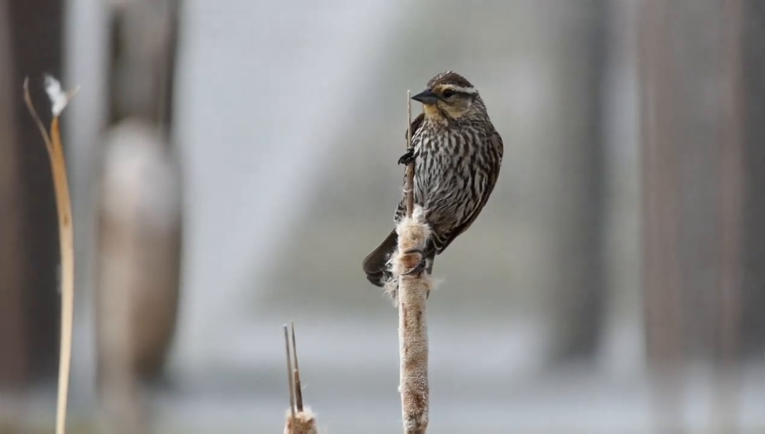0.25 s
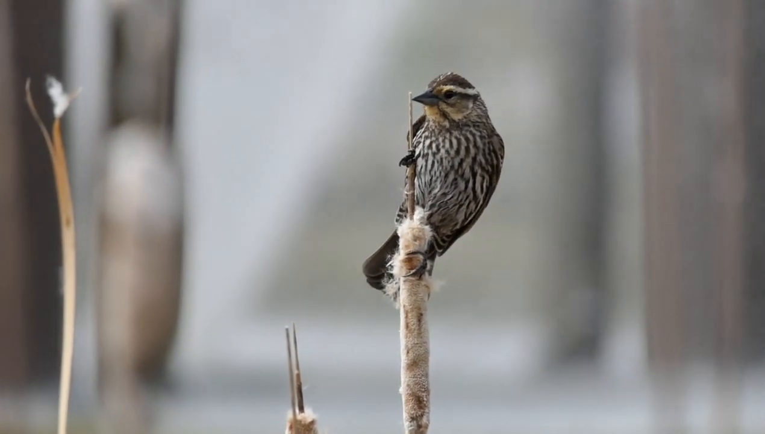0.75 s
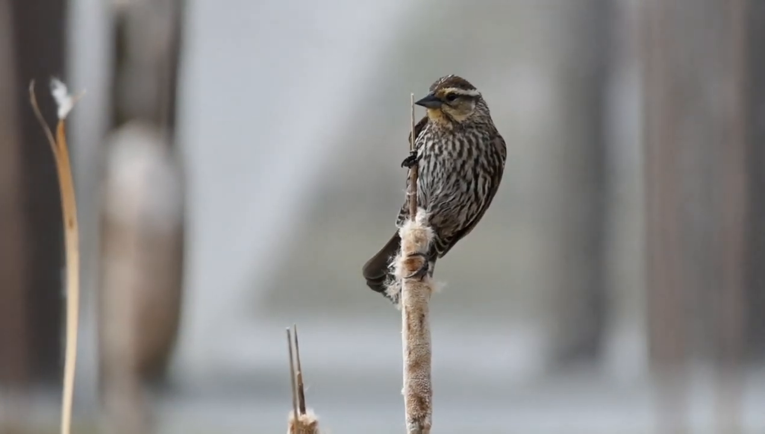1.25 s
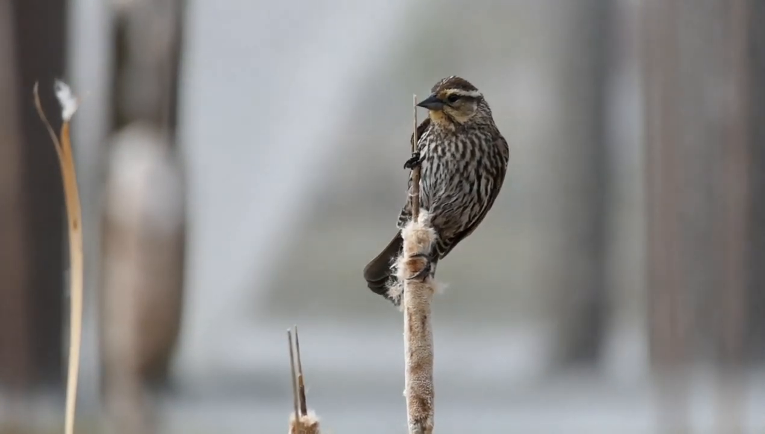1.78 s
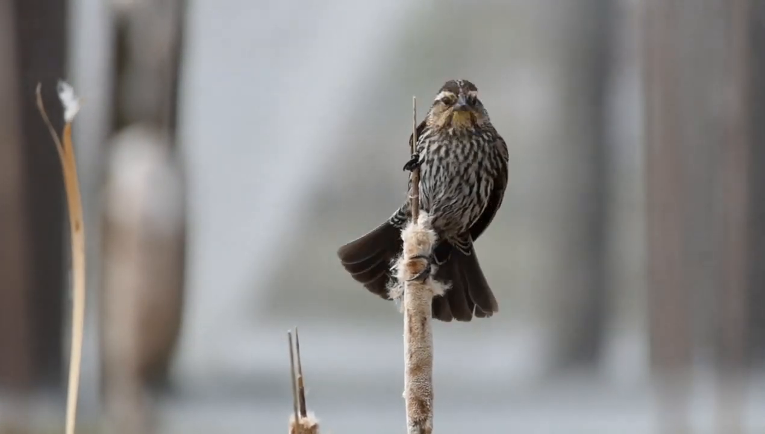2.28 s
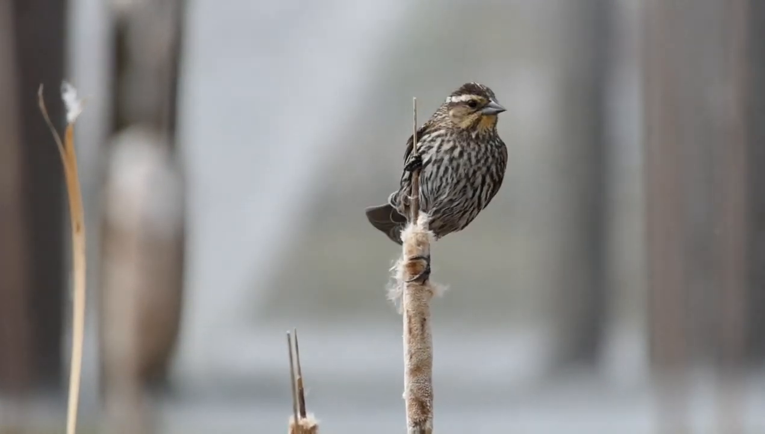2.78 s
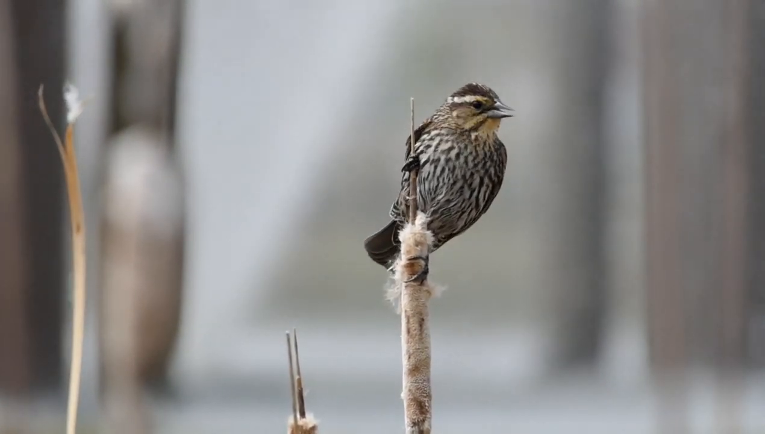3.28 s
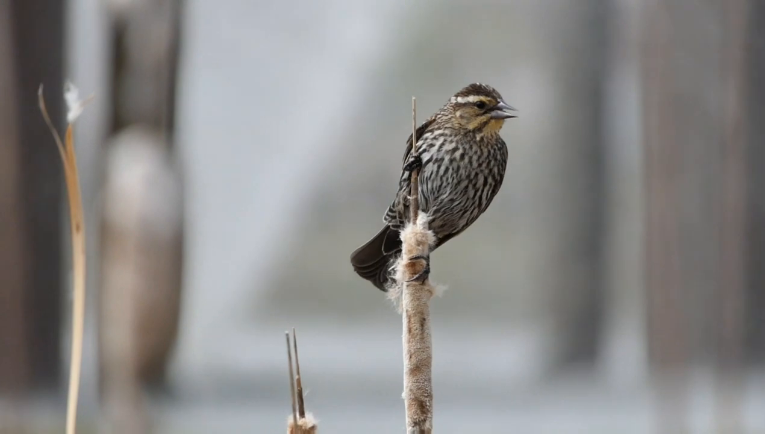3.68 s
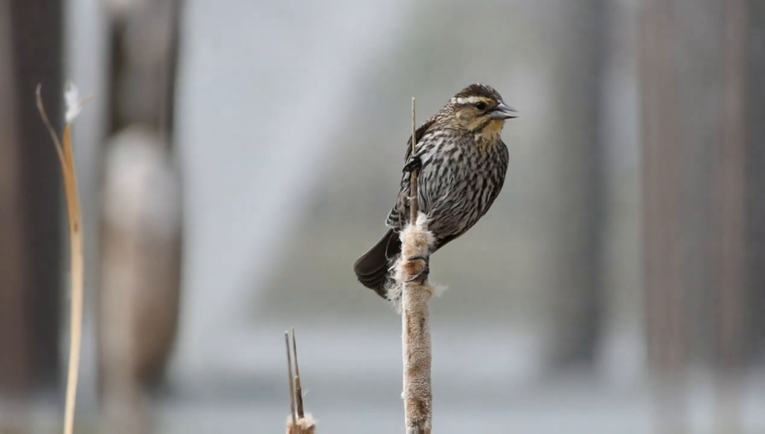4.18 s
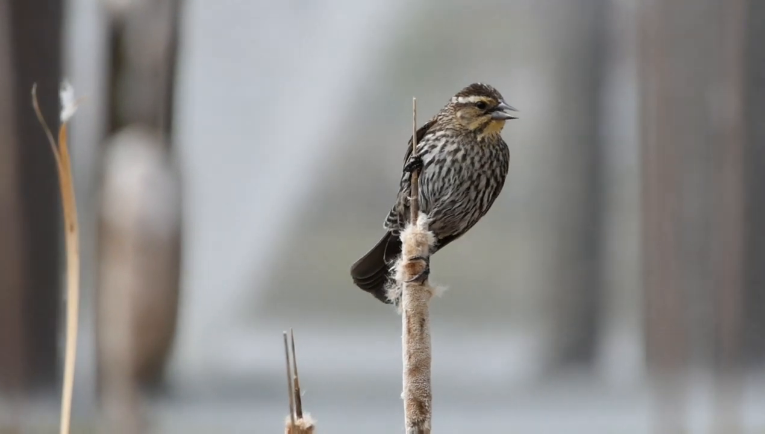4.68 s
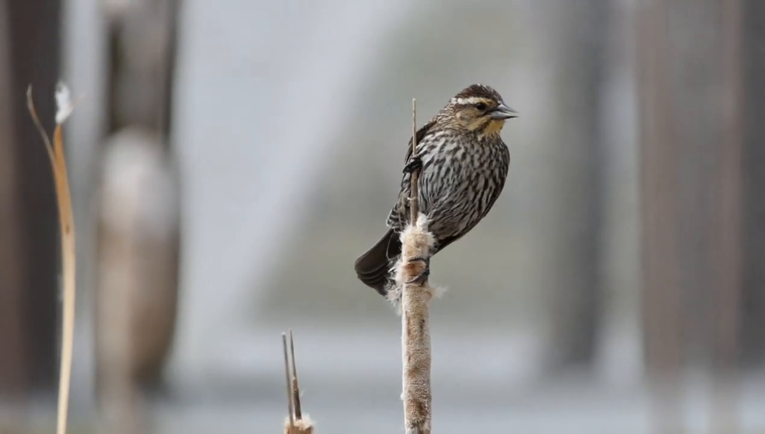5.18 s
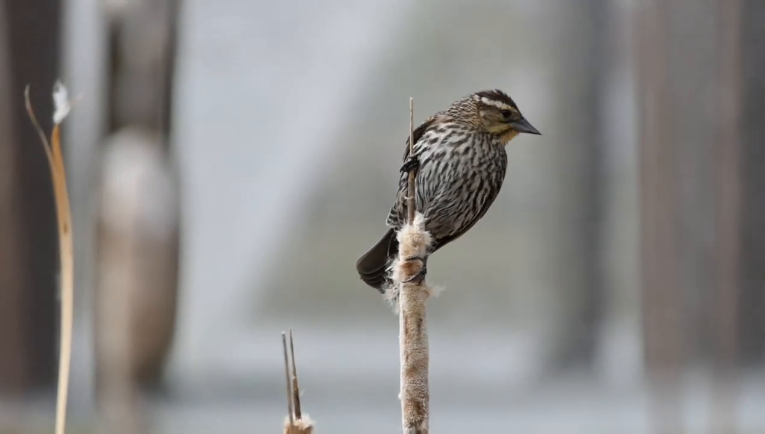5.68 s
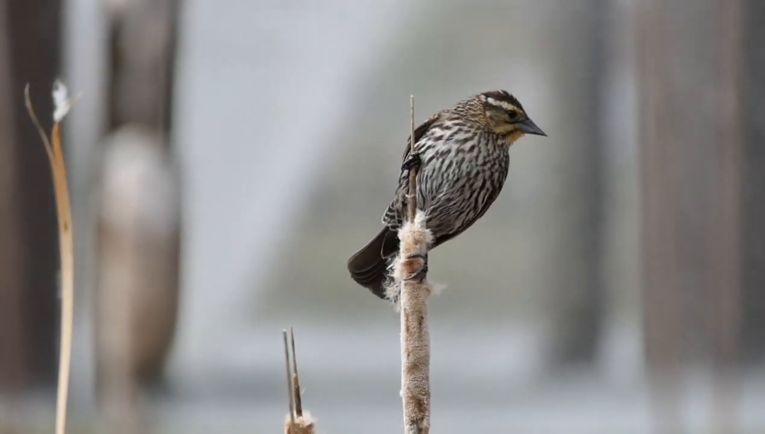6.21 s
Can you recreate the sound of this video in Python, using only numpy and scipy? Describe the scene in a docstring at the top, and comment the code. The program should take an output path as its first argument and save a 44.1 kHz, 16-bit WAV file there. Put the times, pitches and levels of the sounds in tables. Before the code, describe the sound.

In a marsh, a blackbird on the left gives three clear half-second whistles, each dropping sharply and then holding its pitch. Another near the middle makes short harsh chacks and, between the second and third whistles, a quick run of chattering notes. Dry reed stems tick now and then, and distant traffic hums and roars throughout. After the chatter, a sharp click comes as the whole sound dips, then creeps back.

```python
"""A reed bed, with traffic roaring and humming in the distance and dry stems ticking. To the left of the
microphone a blackbird gives three falling whistles, near-sine tones from its syrinx. Another, in the reeds near
the middle, chacks (rough pulses and breath through an open throat) and runs off a chatter. Whistles and chatter
echo off stems, water and a bank. The camera's gain control leans on the loud whistles. Separately, just after
the chatter, a sharp click sounds and the whole level drops at once, then creeps back."""
import sys
import numpy as np
from scipy import signal
from scipy.io import wavfile
from scipy.ndimage import uniform_filter1d

SR = 44100
rng = np.random.default_rng(int(sys.argv[2]) if len(sys.argv) > 2 else 0)


def wav_record(signal):
    """Record a signal, one row per channel, as 16-bit PCM in the file named by sys.argv[1]."""
    frames = np.transpose(np.atleast_2d(signal))
    bounded = np.clip(frames, -1, 1)
    # unit amplitude maps onto the largest positive 16-bit level
    quanta = np.round(bounded * 32767).astype(np.int16)
    wavfile.write(sys.argv[1], SR, quanta)


N = 284445

# Distant traffic, low and high parts of one spectrum: (frequency [Hz], relative density [dB])
RUMBLE_SPECTRUM = [(20, -39), (42, -38.5), (70, -18.5), (120, -12.5), (200, -6.5), (270, -10), (360, -27),
                   (450, -13.5)]
ROAR_SPECTRUM = [(660, -8.5), (900, -16.5), (1300, -11.5), (1700, -16), (2050, -20.5), (2700, -17),
                 (3500, -20.5), (4000, -27), (4600, -31.5), (5200, -30.5), (7500, -33.5), (9000, -40.5),
                 (11000, -50), (11900, -57), (15000, -102.5)]
# Its slow swell: (time [s], level [dB], tilt above 1500 Hz [dB/octave])
ROAR_SWELL = [(0, -21.5, 0.34), (1, -21.5, 0.77), (2, -21.5, 0.26), (3, -21, 0.97), (4, -20.5, 1.3),
              (4.899, -19.5, 1.5), (5.2, -20, 1), (6.45, -21.5, 0.4)]
# Traffic at the two sides of the microphone: (frequency [Hz], coherence [0-1])
ROAR_COHERENCE = [(60, 0.49), (140, 0.92), (350, 0.87), (1000, 0.94), (2000, 0.85), (3000, 0.96),
                  (4500, 0.807), (8000, 0.9), (11500, .7)]
# Its earlier arrival on the left: (frequency [Hz], phase lead [rad])
ROAR_LEFT_LEAD = [(0, 0.028), (1030, 0.36), (1460, -0.0), (1890, 0), (2840, 0.0), (4480, 0.052),
                  (11800, 0.05)]
# Its balance: (frequency [Hz], left minus right [dB])
ROAR_BALANCE = [(60, -0.5), (220, -3), (840, -1), (3120, 0), (11700, 0.0)]
# Faint traffic tones: (frequency [Hz], level [dB], drift width [Hz], steady to drifting part [ratio])
HUM_TONES = [(79.8, -61.5, 2, 1.5), (110.2, -50, 1.5, 2.3), (133, -41, 1.7, 1.9), (260, -45.5, 4.3, 0.29),
             (314.4, -41.5, 6.7, 0.63)]
# Three strong traffic tones: (frequency [Hz], drift width [Hz], steady to drifting part [ratio])
DRONE_TONES = [(54.3, 1., 8.7), (172.8, 27, 2.5), (240, 11, 2.5)]
# Their swelling: (time [s], first level [dB], second level [dB], third level [dB])
DRONE_SWELL = [(0.0, -41, -41, -34), (0.07, -39.5, -25.5, -29), (1.6, -42, -28.5, -23),
               (1.85, -43, -29.5, -36), (2.14, -40, -27, -23.5), (3.18, -43, -31.5, -34),
               (3.32, -40, -32, -23), (3.74, -41, -27.5, -28.5), (3.84, -45, -36, -42),
               (3.93, -35.5, -30, -18.5), (4.11, -42, -29.5, -34), (4.26, -36.5, -32.5, -24.5),
               (4.78, -34, -31.5, -35.5), (4.87, -45, -30, -21), (4.92, -45, -28.5, -31),
               (5.44, -37, -26, -26.5), (6.23, -40.5, -28, -37.5), (6.45, -44, -27, -26)]
# Harsh calls: (middle [s], level [dB], length [s], throat tuning [ratio], left minus right [dB])
CHACK_CALLS = [(0.014, -19.5, 0.032, 1.04, -4), (0.079, -12.5, 0.06, 0.98, -0.5),
               (3.253, -13.5, 0.053, 0.99, 1), (3.46, -10.5, 0.053, 1.01, 1),
               (3.684, -23.5, 0.074, 1.01, 1.5), (4.352, -23.5, 0.0376, 1.04, -5.5),
               (4.934, -14.5, 0.02, 1.07, -2)]
# Throat resonances: (frequency [Hz], width [Hz], relative level [dB])
THROAT_RESONANCES = [(2830, 490, 0), (3296, 420, -1.5), (7000, 1000, -20)]
# Snaps of dry stems, and in the last row a sharp click just as the whole level drops:
# (time [s], peak level [dB], frequency [Hz])
LOUD_TICKS = [(2.011, -16, 3200), (2.0725, -9, 2970), (2.0894, -12, 2570), (2.115, -5, 2730),
              (2.1809, -10.5, 2900), (3.3735, -13, 2510), (3.8751, -10, 2780), (4.9008, -14, 2800)]
# Whistles on the left: (pitch crest [s], release [s], effort [dB], closing fade [s], fade [dB],
# pitch shift in the fade [Hz], final flick [Hz], overtone boost [dB])
WHISTLE_NOTES = [(.778, 1.262, -3, 0.1, -5, -8.5, -89, -1), (2.8, 3.269, -4, .09, -4, 51, 100, 1.5),
                 (5.355, 5.841, -7, 0.061, -13.5, 33.5, 1, -9.5)]
# Brief dips in the whistle's loudness: (deepest point [s], depth [dB], way down [s], way back [s])
WHISTLE_DIPS = [(.92, -6.5, .08, 0.038), (1.0, -0.5, .05, 0.054), (1.15, -1.5, 0.033, .04),
                (2.932, -2, 0.017, 0.016), (2.975, -5.5, 0.066, 0.023), (3.02, -2, .06, 0.088),
                (3.2, -1, .02, .05), (5.455, -1.5, 0.065, .01), (5.471, -17, .012, 0.023),
                (5.56, -0.5, .04, .05), (5.625, -2.5, .03, 0.023), (5.7, -3, .03, .03),
                (5.745, -3.5, .03, 0.033), (5.825, -5, .03, 0.011)]
# Thin upward squeak just before a whistle: (time [s], length [s], from [Hz], to [Hz], effort [dB])
SQUEAK_NOTES = [(0.749, .012, 3400, 4630, -24.5)]
# Harmonics of each voice: (multiple, relative level [dB], extra change with loudness [dB/dB],
# left minus right [dB], left phase lead [rad])
WHISTLE_HARMONICS = [(1, -2.5, 0, 7.5, 0), (2, -32, 1.3, 1, 1.5), (3, -23.5, 0.4, 6.5, 4)]
CHATTER_HARMONICS = [(1, 0, 0.043, -1.3, 0.12), (2, -27.5, 0.24, -1, 0.09), (3, -25.5, 0.46, -.5, .1)]
# One firm echo off a bank, whistler's row then chatterer's: (delay [s], level [dB])
BANK_ECHOES = [(0.012, -20.5), (0.0129, -10.5)]
# Chatter in the reeds: (time [s], time to second crest [s], first crest [Hz], dip [Hz],
# second crest [Hz], effort [dB], swell up to the second crest [dB])
CHATTER_NOTES = [(3.803, .030, 3670, 3550, 3870, -17, -7), (3.909, 0.037, 3550, 2750, 3280, -15, -9),
                 (4.018, 0.033, 3516, 3320, 3635, -12.5, -0.5),
                 (4.133, 0.042, 3417, 3300, 3370, -13.5, 0.5), (4.249, 0.043, 3275, 3150, 3220, -12.5, 1.5),
                 (4.37, 0.038, 3246, 2990, 3170, -14.5, -7), (4.488, .044, 3455, 3010, 3470, -10.5, 2),
                 (4.616, 0.042, 3320, 3070, 3430, -10, 0.5), (4.752, .040, 3262, 3222, 3174, -10.5, 2)]
# The whole level falls at once and creeps back: (time [s], step [dB], recovery [dB/s])
LEVEL_DROP = (4.904, -7, 3.9)


def gain_of(db):
    """Decibels to gain."""
    return 10 ** (np.asarray(db) / 20)


def unit_rms(x):
    """Scales to rms 1."""
    return x / np.sqrt(np.mean(np.abs(x) ** 2) + 1e-20)


def curve_at(points, hz):
    """Interpolates a table on a log-frequency axis."""
    f, value = np.transpose(points)
    return np.interp(np.log(hz + 1), np.log(f + 1), value)


def add(mix, start_s, sound):
    """Mixes a sound in at its start time."""
    part = mix[..., max(round(start_s * SR), 0):][..., :sound.shape[-1]]
    part += sound[..., :part.shape[-1]]


def panned(x, lean_db):
    """Places a mono sound left (+) or right (-) of the microphone."""
    return x * gain_of(np.array([[.5], [-.5]]) * lean_db)


def smooth(x, span_s):
    """Rounds the corners of a control curve."""
    return uniform_filter1d(x, max(round(span_s * SR), 1), mode="nearest")


def traffic_roar(patchy_db=1.3):
    """Far tyres and engines all round the microphone: noise with drifting louder and softer patches."""
    frames, hz = N // 256 + 5, np.fft.rfftfreq(1024, 1 / SR)
    a, b, c, d, patches = rng.standard_normal((frames, 513, 5)).T
    left, independent = a + 1j * b, c + 1j * d
    patches = unit_rms(uniform_filter1d(uniform_filter1d(patches, 12, 0), 14, 1))
    coherence = np.clip(curve_at(ROAR_COHERENCE, hz), -1, 1)[:, None]
    spectra = np.array([left, coherence * left + np.sqrt(1 - coherence ** 2) * independent])
    spectra[0] *= np.exp(1j * curve_at(ROAR_LEFT_LEAD, hz))[:, None]
    lean_db = np.array([[.5], [-.5]]) * curve_at(ROAR_BALANCE, hz)
    shape_db = curve_at(RUMBLE_SPECTRUM + ROAR_SPECTRUM, hz) + lean_db
    spectra *= gain_of(shape_db[..., None] + patchy_db * patches)
    times, level_db, tilt_db = np.transpose(ROAR_SWELL)
    octaves = np.log2(np.maximum(hz / 1500, 1))[:, None]
    spectra *= gain_of(octaves * np.interp((np.arange(frames) - 2) * 256 / SR, times, tilt_db))
    noise = signal.istft(spectra, nperseg=1024, noverlap=768)[1][:, :N]
    return gain_of(np.interp(np.arange(N) / SR, times, level_db)) * unit_rms(noise)


def traffic_hum(lean_db=-2.0):
    """Low tones of the far traffic, a little to the right: each is part steady, part random drift."""
    t, out = np.arange(N) / SR, np.zeros(N)
    drift_t, drift_hz = np.arange(1024) * N / SR / 1024, np.fft.fftfreq(1024, N / SR / 1024)
    times, *levels = np.transpose(DRONE_SWELL)
    drones = [(hz, np.interp(t, times, db), width, steady)
              for (hz, width, steady), db in zip(DRONE_TONES, levels)]
    for hz, db, width, steady in HUM_TONES + drones:
        re, im = rng.standard_normal((2, 1024))
        drift = unit_rms(np.fft.ifft((re + 1j * im) * np.exp(-.5 * (2 * drift_hz / width) ** 2)))
        swing = np.interp(t, drift_t, (steady + drift) / np.hypot(steady, 1))
        out += np.sqrt(2) * gain_of(db) * (swing * np.exp(2j * np.pi * hz * t)).real
    return panned(out, lean_db)


def resonate(x, hz, width_hz):
    """A gliding resonance: shifts the curve hz down to zero, smooths twice and shifts back."""
    turn, pole = np.exp(2j * np.pi * np.cumsum(hz) / SR), np.exp(-np.pi * width_hz / SR)
    return 2 * (turn * signal.lfilter([(1 - pole) ** 2], [1, -2 * pole, pole * pole], x / turn)).real


def chacks(pulse_hz=380, jitter=.7, breath=1.7, opening=.088):
    """The bird in the reeds drives uneven pulses and breath noise through a wide-open throat."""
    out, t = np.zeros((2, N)), (np.arange(4096) - 2048) / SR
    for middle, db, length, tuning, lean_db in CHACK_CALLS:
        wobble, hiss = rng.standard_normal((2, len(t)))
        cycles = np.cumsum(pulse_hz * (1 + jitter * unit_rms(uniform_filter1d(wobble, 60)))) / SR
        drive = unit_rms(np.diff(np.floor(cycles), prepend=0)) + breath * hiss
        rise = tuning * (1 + opening * np.tanh(3 * t / length))  # resonances rise as the bill opens
        voice = sum(gain_of(peak_db) * unit_rms(resonate(drive, hz * rise, width))
                    for hz, width, peak_db in THROAT_RESONANCES)
        burst = gain_of(db) * unit_rms(voice) * np.exp(-.5 * (4 * t / length) ** 2)
        start = middle + t[0]
        early = max(round(-start * SR), 0)  # samples before time zero
        add(out, start, panned(burst[early:], lean_db))
    return out


def ticks(per_s=40, faint_db=-30, crackle_hz=2800, t60=.0058):
    """Dry stems snap and ring briefly over a faint crackle; one sharp click comes as the level drops."""
    t, out = np.arange(400) / SR, np.zeros(N)
    decay = gain_of(-60 * t / t60)
    for start, db, hz in LOUD_TICKS:
        add(out, start, gain_of(db) * decay * np.sin(2 * np.pi * hz * t))
    impulses = gain_of(faint_db + 2.2 * rng.exponential(1, N)) * (rng.random(N) < per_s / SR)
    return out + signal.oaconvolve(impulses, decay * np.sin(2 * np.pi * crackle_hz * t))[:N]


def syrinx(hz, voice_db, harmonics, waver=.0025, flutter_db=.28, overtone_flutter_db=2.5):
    """A slightly unsteady near sine; each harmonic leaves the bill in its own direction."""
    wobble, flutter = (unit_rms(uniform_filter1d(v, 300)) for v in rng.standard_normal((2, len(hz))))
    phase = 2 * np.pi * np.cumsum(hz * (1 + waver * wobble)) / SR
    voice_db = voice_db + flutter_db * flutter
    voice = np.zeros((2, len(hz)))
    for k, db, steepness, lean_db, lead in harmonics:
        level_db = db + (1 + steepness) * voice_db + (k > 1) * overtone_flutter_db * wobble
        voice += gain_of(level_db) * panned(np.sin(k * phase + [[lead], [0]]), lean_db)
    return np.sqrt(2) * voice


def whistles(rest_hz=2435.6, settle_hz=216, settle_s=.17, dive_hz=780, dive_s=.0185, scoop_s=.014,
             flick_s=.015, attack_db_per_s=743, release_db_per_s=800, roof_hz=8200):
    """The bird on the left: each whistle scoops up to a crest, dives, then settles towards rest."""
    out, clock = np.zeros((2, N)), np.arange(N) / SR
    dips_db = sum(np.interp(clock, [at - down, at, at + back], [0, db, 0])
                  for at, db, down, back in WHISTLE_DIPS)
    for crest, release, db, fade_s, fade_db, shift_hz, flick_hz, boost_db in WHISTLE_NOTES:
        t = np.arange(crest - .02, release + .068, 1 / SR)
        age, late = t - crest, np.maximum(t - release, 0)
        fading = np.clip(1 + (t - release) / fade_s, 0, 1)
        hz = rest_hz + settle_hz * np.exp(-age / settle_s)
        hz += dive_hz / np.cosh(age / np.where(age < 0, scoop_s, dive_s))
        hz += shift_hz * fading + flick_hz * np.minimum(late / flick_s, 1)
        # Effort climbs until just after the crest, holds and lets go.
        effort_db = db + attack_db_per_s * np.minimum(age - .016, 0) - release_db_per_s * late
        effort_db -= 2 * np.exp(-np.abs(age) / .1)  # the dive is softer than the held note
        level_db = effort_db + fade_db * fading + np.interp(t, clock, dips_db)
        harmonics = []
        for k, harmonic_db, *rest in WHISTLE_HARMONICS:
            loss_db = 10 * np.log10(1 + (k * hz / roof_hz) ** 16)  # high overtones hardly leave the bill
            harmonics.append((k, harmonic_db + (k > 1) * (boost_db - loss_db), *rest))
        tone = syrinx(hz, smooth(level_db, .006), harmonics, waver=.0013)
        add(out, t[0], tone * signal.windows.tukey(len(t), .03))
    return out


def squeak():
    """The whistler's syrinx sweeps briefly upward, without overtones, ahead of the first whistle."""
    out = np.zeros((2, N))
    for start, length, low_hz, high_hz, db in SQUEAK_NOTES:
        hz = np.linspace(low_hz, high_hz, round(length * SR))
        add(out, start, syrinx(hz, db, WHISTLE_HARMONICS[:1]) * np.hanning(len(hz)))
    return out


def reed_echoes(x, t60, gap_s, count=400, spacing=40):
    """Stems and water scatter a call back to the microphone as sparse echoes of random sign."""
    offset, polarity = rng.random((2, count, 2)).transpose(2, 0, 1)
    delays = np.arange(count) * spacing + (offset * spacing).astype(int)
    gains = np.sign(polarity - .5) * gain_of(-60 * delays / SR / t60) * (delays > gap_s * SR)
    taps = np.zeros((2, count * spacing))
    np.put_along_axis(taps, delays, gains, 1)
    taps[1] = .78 * taps[0] + .52 * taps[1]  # the two sides share most echoes
    return signal.fftconvolve(x, taps / np.linalg.norm(taps[0]), axes=1)[:, :N]


def chatter(leap_hz=568, leap_s=.0119, plunge_hz=1100, plunge_s=.015, plunge_db=-7.5, dip_db_per_khz=5):
    """The bird in the reeds: each note leaps up, weakens in a dip between two crests and drops away."""
    out = np.zeros((2, N))
    for start, crest_s, first_hz, dip_hz, second_hz, db, swell_db in CHATTER_NOTES:
        t = np.arange(0, crest_s + plunge_s, 1 / SR)
        turns = [leap_s, leap_s + .6 * (crest_s - leap_s), crest_s]  # crest, dip, crest
        pitches = [first_hz - leap_hz, first_hz, dip_hz, second_hz, second_hz - plunge_hz]
        hz = smooth(np.interp(t, [0, *turns, t[-1]], pitches), .0016)
        dip_khz = np.interp(t, turns, [0, (first_hz + second_hz) / 2 - dip_hz, 0]) / 1000
        effort_db = db + swell_db * (np.minimum(t / crest_s, 1) - .5) - dip_db_per_khz * dip_khz
        effort_db += plunge_db * np.maximum(t - crest_s, 0) / plunge_s
        note = syrinx(hz, smooth(effort_db, .004), CHATTER_HARMONICS, waver=.004, flutter_db=1.75)
        ramps = np.minimum(t / .0086, (t[-1] - t) / .0046)
        add(out, start, note * np.minimum(ramps, 1))
    return out


def scene():
    """From the microphone: whistler on the left, chatterer near the middle, far traffic all round."""
    whistler, chatterer = whistles() + squeak(), chatter()
    birds = whistler + gain_of(-21) * reed_echoes(whistler, t60=.14, gap_s=.004)
    birds += chatterer + gain_of(-15) * reed_echoes(chatterer, t60=.08, gap_s=.003)
    for bird, (delay, db) in zip((whistler, chatterer), BANK_ECHOES):
        add(birds, delay, gain_of(db) * bird)
    return birds + chacks() + ticks() + traffic_roar() + traffic_hum()


def record(dry, knee_db=-12, slope=.36, fall_s=.33, recover_db_per_s=1.5, treble_hz=11000, edge_hz=15400):
    """Treble roll-off, gain control led by the louder side, a sudden drop, overload, band limit."""
    hop, t = 256, np.arange(N) / SR
    soft = signal.lfilter(*signal.butter(4, treble_hz, fs=SR), dry)
    power = np.abs(uniform_filter1d(soft ** 2, 2048, axis=1))[:, ::hop].max(0)
    excess_db = np.maximum(10 * np.log10(power + 1e-12) - knee_db, 0)
    cut_db, cuts = 0, []
    for want_db in slope * excess_db:  # the gain eases down under loud sound and climbs back slowly
        cut_db += max((want_db - cut_db) / fall_s, -recover_db_per_s) * hop / SR
        cuts.append(cut_db)
    cut_db = np.interp(t, np.arange(len(cuts)) * hop / SR, cuts)
    drop_s, step_db, back_db_per_s = LEVEL_DROP
    drop_db = (t > drop_s) * np.minimum(step_db + back_db_per_s * (t - drop_s), 0)
    clipped = np.clip(soft * gain_of(drop_db - cut_db), -.93, .93)  # the loudest peaks flatten and rasp
    dulled = signal.lfilter(*signal.butter(8, 12600, fs=SR), clipped)
    band_limit = signal.firwin(511, edge_hz, window=("kaiser", 9), fs=SR)
    return signal.oaconvolve(dulled, band_limit[None], "same")


dry = scene()
out = record(dry)
wav_record(out)
```